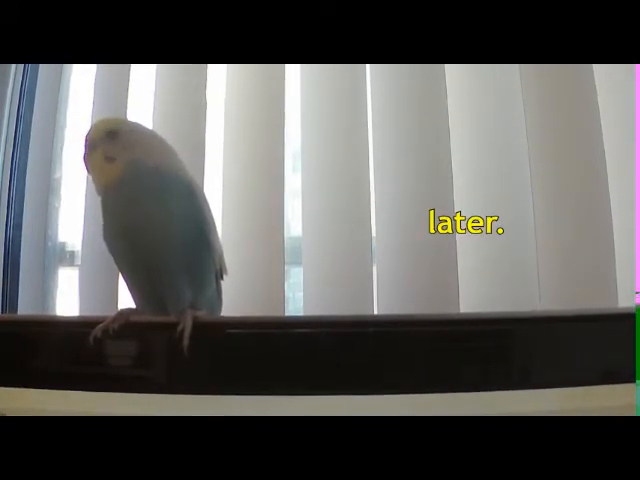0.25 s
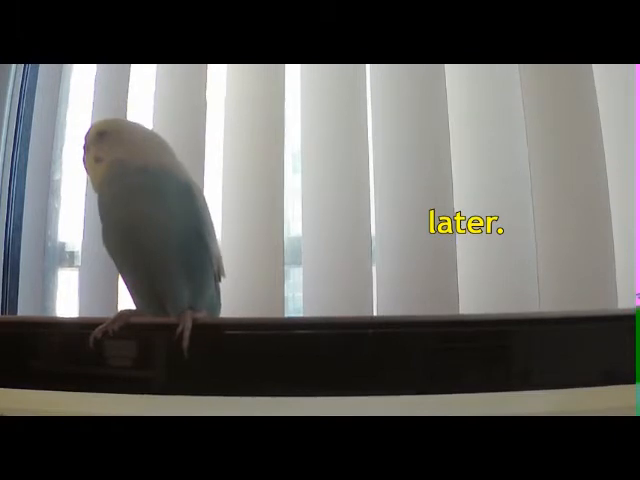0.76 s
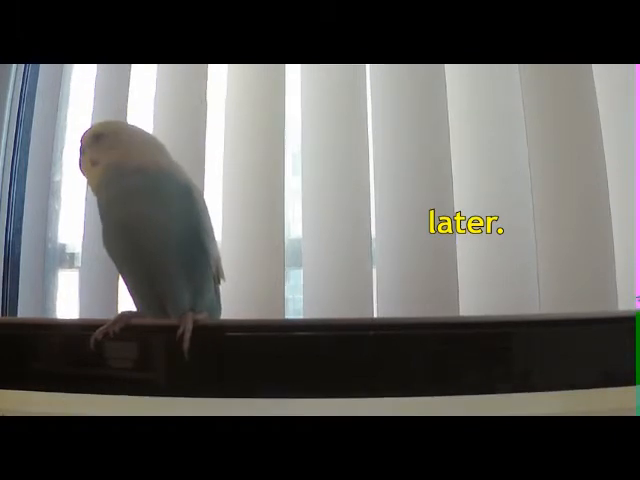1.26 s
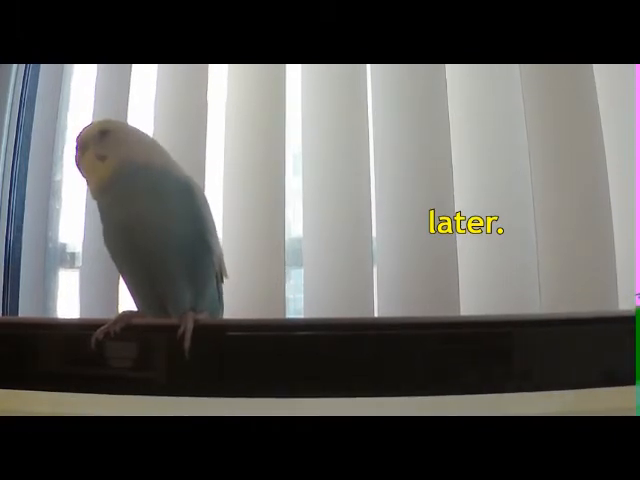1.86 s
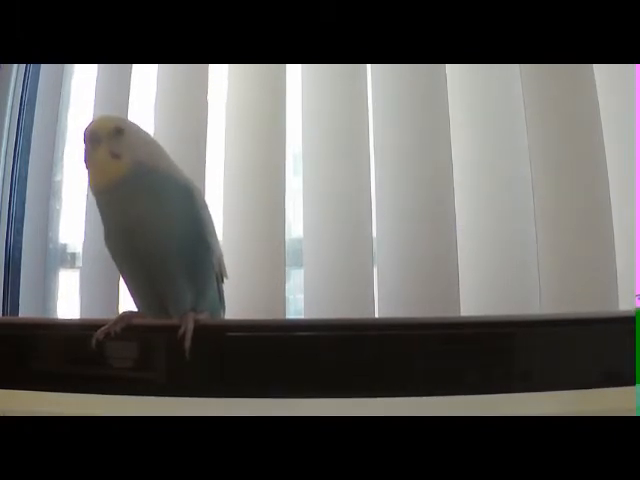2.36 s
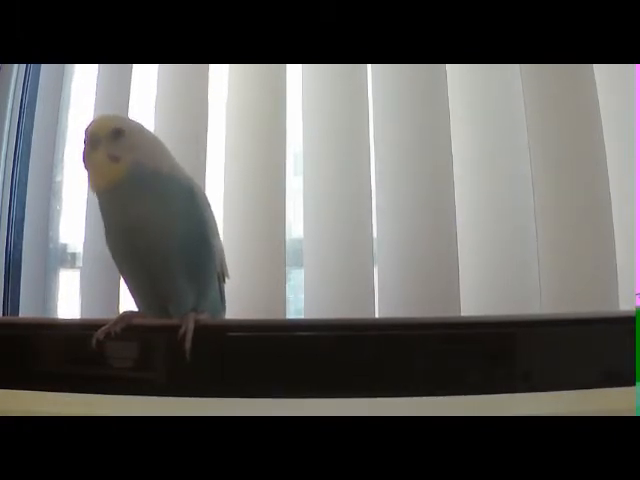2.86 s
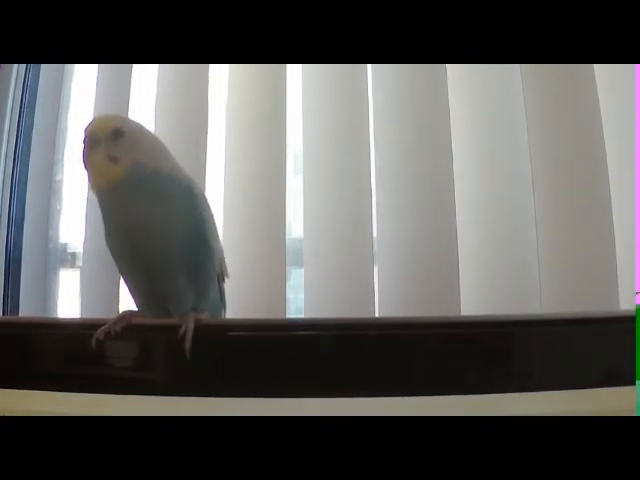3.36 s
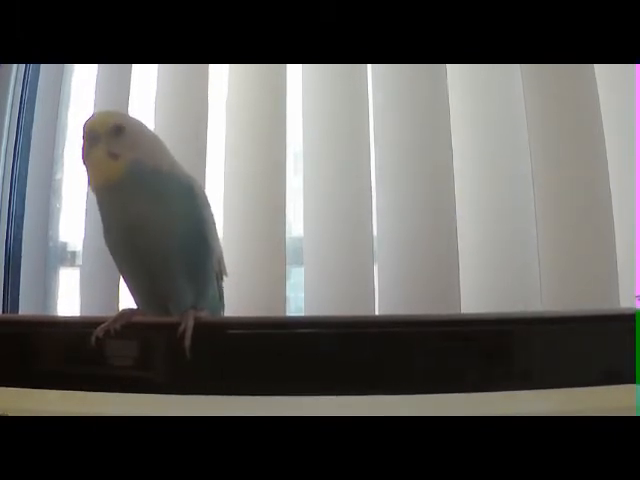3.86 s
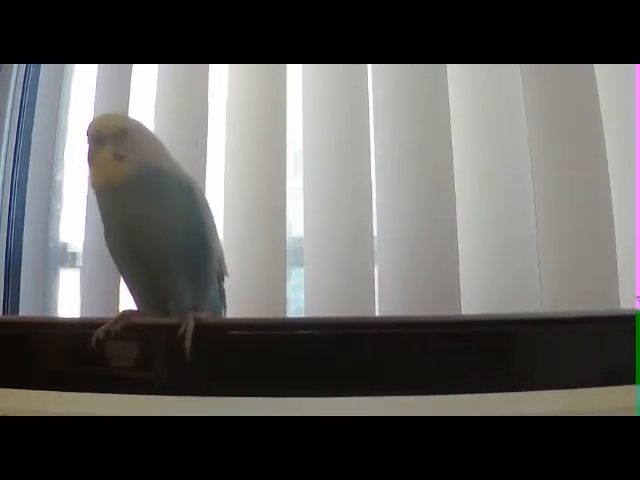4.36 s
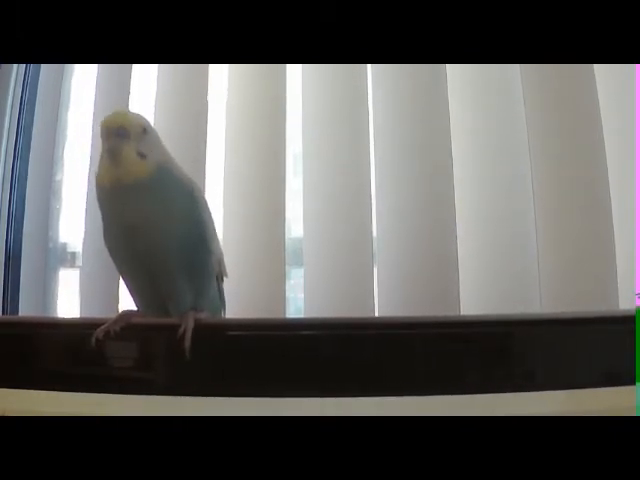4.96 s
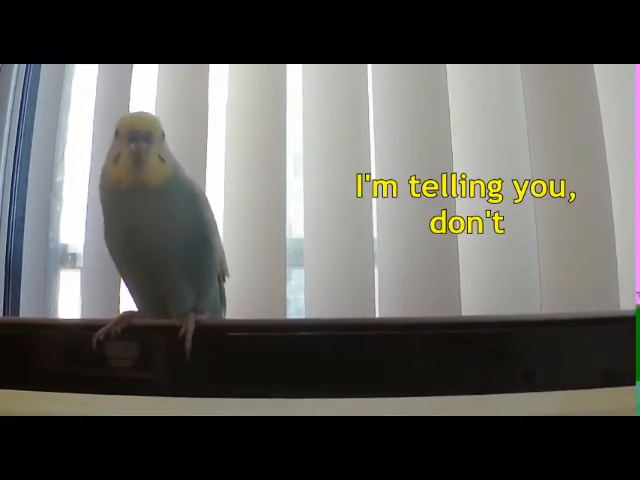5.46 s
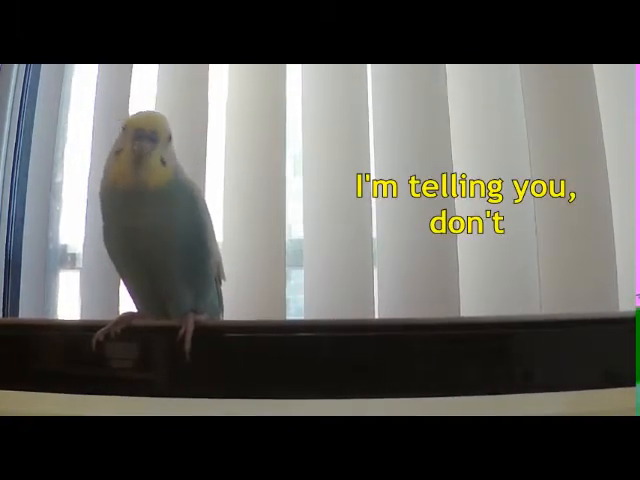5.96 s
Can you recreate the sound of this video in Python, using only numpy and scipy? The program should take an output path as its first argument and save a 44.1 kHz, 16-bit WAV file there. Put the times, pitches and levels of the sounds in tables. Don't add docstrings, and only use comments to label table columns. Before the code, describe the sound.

Close stereo pickup of a budgie indoors, slightly to the left, with brief wall reflections. Steady fan air and uneven low rumble lie underneath. The bird opens with a buzzy gated warble that breaks into slower stutters, then peeps and whistles piercingly. Isolated clucks and short calls lead to a bright descending five-chirp trill. It finishes with beak clicks, raspy breathy chatter and scattered clucks.

```python
import sys
import numpy as np
from scipy import signal
from scipy.fft import rfft, irfft, next_fast_len
from scipy.io import wavfile
from scipy.ndimage import uniform_filter1d, map_coordinates

SR = 44100
rng = np.random.default_rng(int(sys.argv[2]) if len(sys.argv) > 2 else 0)


def volts_from_decibels(level):
    exponent = np.asarray(level, float) / 20
    return 10 ** exponent


def materialize(psi):
    bounded = np.clip(np.atleast_2d(psi).T, -1, 1)
    quanta = np.round(bounded * 32767).astype(np.int16)
    wavfile.write(sys.argv[1], SR, quanta)


N = 273420
LEFT_RIGHT = np.array([[.5], [-.5]])

# [t/s, f/Hz, level/dB]
CHIRPS = [
    [(4.529, 3750, -37), (4.535, 3520, -25.5), (4.545, 3554, -26), (4.559, 3050, -11.5), (4.567, 3020, -8),
     (4.577, 2625, -11.5), (4.583, 2680, -17), (4.589, 2378, -14.5), (4.601, 2397, -13.5)],
    [(4.601, 3674, -21.5), (4.611, 3645, -19), (4.623, 3220, -18), (4.627, 3153, -13.5),
     (4.635, 3064, -15.5), (4.647, 2830, -22.5), (4.657, 2825, -16.5), (4.665, 2533, -22),
     (4.671, 2462, -22)],
    [(4.672, 3774, -28), (4.682, 3710, -22), (4.69, 3258, -17.5), (4.702, 3100, -14), (4.71, 2803, -18.5),
     (4.718, 2830, -17.5), (4.726, 2540, -17.5), (4.733, 2440, -19)],
    [(4.734, 3884, -36.5), (4.744, 3640, -23), (4.756, 3275, -31.5), (4.76, 3100, -21.5), (4.77, 3175, -19),
     (4.792, 2380, -18), (4.801, 2366, -23)],
    [(4.813, 3446, -17), (4.819, 3443, -31), (4.827, 3090, -13), (4.837, 3095, -24), (4.847, 2740, -16.5),
     (4.851, 2665, -23), (4.857, 2425, -15), (4.863, 2384, -16.5), (4.872, 2460, -18)],
]
# [f/Hz, level/dB]
CHIRP_OVERTONE_FADE = [(2420, -29.5), (2750, -15), (3060, -18), (3400, -10), (3720, -8)]
CHIRP_BRIGHT_DB = [-0.5, 0, 3.5, 3, 2.5]
# [start t/s, length t/s, first f/Hz, last f/Hz, level/dB]
PEEPS = [
    (1.669, 0.038, 2520, 3040, -39.5),
    (1.748, 0.04, 2764, 3055, -38),
    (4.87, 0.013, 3800, 3500, -29),
]
# [t/s, f/Hz, level/dB]
CALLS = [
    [(1.852, 2260, -24), (1.86, 2160, -48.5), (1.872, 2530, -23.5), (1.876, 2510, -24.5),
     (1.894, 2535, -40), (1.905, 3100, -33)],
    [(1.906, 3800, -38.5), (1.916, 3760, -26), (1.924, 3720, -21), (1.931, 3560, -20), (1.941, 3330, -9),
     (1.946, 3560, -4.5), (1.958, 3590, -9.5), (1.967, 3713, -8.5), (1.977, 3716, -39)],
    [(2.96, 2900, -37), (2.968, 2824, -20.5), (2.974, 2893, -15), (2.98, 2883, -15), (2.986, 3100, -20),
     (2.989, 3030, -17.5), (2.993, 2750, -31)],
    [(3.815, 3470, -27), (3.824, 3430, -32), (3.828, 3150, -25.5), (3.833, 3470, -16), (3.844, 3200, -29),
     (3.849, 2904, -16), (3.863, 2850, -17.5), (3.869, 2680, -19), (3.878, 2490, -43)],
    [(4.127, 3560, -32), (4.139, 3370, -24.5), (4.157, 2830, -18), (4.165, 2834, -19), (4.169, 2910, -17),
     (4.191, 2423, -19.5), (4.199, 2446, -24), (4.203, 2474, -42)],
]
# [first level/dB, last level/dB]
CALL_BRIGHT_DB = [(-29, -22), (-12, -22), (-12, -21.5), (-8.5, -25), (-13, -34)]
# [t/s, depth/dB]
CATCHES = [(1.872, 24), (1.881, 14), (1.929, 3), (1.9327, 6), (1.9445, 15), (1.9478, 11), (1.951, 24),
           (1.96, 6), (1.9674, 14), (2.966, 17), (2.97, 11), (2.981, 11), (2.992, 9), (2.992, 12),
           (3.825, 6), (3.8319, 21), (3.847, 8), (3.856, 15), (3.8668, 14), (3.87, 14), (4.148, 18),
           (4.166, 10), (4.178, 25),
           (4.5545, 4), (4.5597, 0), (4.5682, 18), (4.5722, 9), (4.577, 14), (4.5865, 4), (4.614, 2),
                 (4.6215, 4), (4.643, 9), (4.6488, 2), (4.688, 8), (4.694, 5), (4.711, 4), (4.7202, 8),
                 (4.7473, 6), (4.7555, 7), (4.772, 2), (4.782, 5), (4.7859, 16), (4.823, 5), (4.8414, -4),
                 (4.854, 5)]
# [t/s, depth 0-1, width/s]
SLOW_REED = [(1.953, 0.64, 0.003), (2.962, 0.7, 0.0034), (2.987, 0.47, 0.0093)]
# [level/dB, flutter strength]
FLUTTER = [(-40, 1.5), (-30, .55), (-20, .32), (-8, .24)]
# [multiple of the pitch, level/dB]
OVERTONES = [(2, -11), (3, 3), (4, 4.5), (5, 9), (6, 17)]
# [f/Hz, level/dB per Hz]
TURBULENCE = [(3500, -30), (4800, -16), (6180, -10), (7090, -13), (8610, -9), (11100, 1), (15700, -5)]
# [f/Hz, level/dB]
BEAK_TO_MIC = [(1000, -8), (3000, -25), (5000, -8), (7000, -0.5), (8800, 1.5), (11000, -10), (13000, -25.5),
               (16000, -8)]

# [t/s, peak level/dB, extra brightness/dB]
GATES = [(0.674, -18.5, 5), (0.691, -21.5, -1), (0.6972, -24, -6), (0.7038, -19, -6), (0.716, -20.5, 2),
         (0.727, -19, -5), (0.738, -19.5, 5), (0.7512, -19, -2), (0.763, -28, 7), (0.7731, -21.5, 1),
         (0.785, -21.5, -1), (0.7973, -17, -5), (0.809, -21.5, 3.5), (0.8209, -25, 3), (0.8315, -14.5, -11),
         (0.845, -17.5, -2), (0.8577, -20.5, -4), (0.8678, -24, 1.5), (0.8812, -13, -7),
         (0.894, -17.5, 1.5), (0.9046, -13.5, -4), (0.9176, -12, -2), (0.9286, -15.5, -2), (0.9401, -15, 0),
         (0.9552, -17.5, 11), (0.9666, -14, -6), (0.9804, -13.5, -1.5), (0.998, -14, -1)]
# [f/Hz, upper f/Hz, upper level/dB]
GATE_TONES = [(1050, 2240, -5), (1940, 3112, -3), (1960, 1500, -2), (1090, 3144, -5), (1190, 2487, 3),
              (1160, 2340, -2), (1174, 2476, 5), (1110, 2200, 3), (1040, 2800, 10), (1055, 2229, 3),
              (1109, 2300, 6), (1274, 2573, 5), (1332, 2616, 11.5), (1324, 2627, 14), (1280, 4000, 1),
              (1400, 2885, 4), (1271, 2595, 3), (1460, 2961, 10), (1560, 1900, -6), (1626, 3700, -5),
              (1580, 3070, -4), (1630, 3300, -6), (1540, 2918, -1), (1626, 3144, -6), (1690, 1992, 3),
              (1647, 3800, -7), (1744, 6100, -8), (1647, 1900, -11)]
# [t/s, brightness/dB]
CHURR_BRIGHT = [(0.6748, -16), (0.7042, -6.5), (.7396, -10.5), (0.7735, -8), (0.8092, -3), (0.8812, -4),
                (.955, -13), (0.9809, -9), (0.998, -7)]
# [t/s, peak level/dB, f/Hz, brightness/dB]
STUTTER = [(0.611, -18.5, 1570, -20), (.628, -28.5, 1595, -8), (0.6453, -15.5, 1470, -13),
           (0.6585, -16.5, 1600, -13), (0.6667, -18, 1070, -13), (0.6828, -24.5, 1150, -7),
           (1.0112, -13.5, 1850, -15), (1.0212, -18, 1960, -7.5), (1.035, -13.5, 1960, -14.5),
           (1.046, -11, 1960, -16.5), (1.0581, -13.5, 1900, -20), (1.0719, -12.5, 1600, -31),
           (1.098, -14, 1600, -31), (1.1053, -12, 1960, -18.5), (1.1238, -15.5, 1626, -21),
           (1.146, -11, 1600, -25), (1.175, -16.5, 1647, -25), (1.2055, -15.5, 1550, -25),
           (1.257, -16, 1940, -17), (1.296, -24.5, 1130, -19)]
# [f/Hz, level/dB]
STUTTER_TONES = [(3120, -7), (3070, -3), (3015, 0.5), (3120, -11), (3100, -3), (2530, 2), (2900, -10),
                 (2590, -10), (3840, -21), (3780, -18), (1730, 5), (1949, -14), (2620, -17), (1600, 2),
                 (1916, -1), (2580, -18), (3100, -18), (1916, -8), (1647, -5), (1960, -2)]
# [t/s, peak level/dB, f/Hz, brightness/dB]
CLUCKS = [(2.7272, -18, 1616, -12), (2.8825, -26, 2270, -30), (2.854, -31, 1450, -13),
          (2.8675, -31, 2400, -30), (2.8735, -10.5, 2440, -42), (3.6096, -24.5, 1406, -27),
          (3.7194, -28.5, 1496, -25), (3.7993, -22, 1940, -15), (5.657, -22, 1960, -18),
          (5.678, -22, 2450, -21), (5.715, -21, 1434, -39), (5.7295, -14, 1630, -32),
          (5.7424, -10.5, 2400, -27), (5.751, -21, 2000, -30), (5.756, -14, 1960, -22.5),
          (5.859, -21.5, 1240, -38), (5.874, -17, 1240, -25), (5.885, -22, 1140, -35),
          (5.9, -17, 1286, -32), (5.932, -14.5, 1410, -39), (5.95, -14, 1580, -42),
          (5.9707, -17, 1660, -20), (6.1053, -21, 2030, -14), (6.119, -24, 1960, -28),
          (6.1294, -22.5, 1044, -15.5), (6.167, -38, 1200, -2)]
# [cluck f/Hz, other f/Hz]
CLUCK_SECOND_HZ = [(1200, 1300), (1360, 2750), (1420, 1980), (1500, 2650), (1603, 3380), (1666, 2430),
                   (1950, 3020), (2400, 2010)]
# [cluck f/Hz, level/dB]
CLUCK_SECOND_DB = [(1200, -11), (1420, 0), (1500, -12), (1603, -4.5), (1666, -7), (1950, -10), (2400, -10)]
# [brightness/dB, attack/s, hold/s, time to fall 60 dB/s]
SWELL = [(-28, 0.0016, 0.0041, 0.025), (-17, 0.0018, 0.0023, 0.026), (-6, 0.0011, 0.0031, 0.024)]
# [f/Hz, level/dB per Hz]
RUSTLE = [(700, -9), (1100, -7.5), (1600, 10), (2000, 8.5), (2600, 4), (3300, -1), (3900, -10),
          (5000, -21.5), (6500, -30)]

# [start t/s, length t/s, level/dB, upper throat level/dB, breath level/dB]
CHATTER = [
    (1.932, 0.047, -39, 21, -41),
    (1.889, 0.023, -46, 19, -38),
    (2.853, 0.048, -34, 30, -41),
    (5.65, 0.078, -35, 15, -36),
    (5.722, 0.13, -24, 7.5, -36.5),
    (5.898, 0.076, -38, -4, -39.5),
    (6.067, 0.048, -44, 2, -38),
]
PULSED = [.5, .5, .5, .12, .9, .6, .5]
# [share of length, effort/dB, beak closing/dB, breath/dB]
PHRASE_SHAPE = [(0, -8.5, -10, -12), (.12, -3, -3, -12), (.3, -3, -7.5, 6), (.9, -5, -18, -8),
                (1, -4, -20, -18)]
# [f/Hz, width/Hz, level/dB]
CHEST = [(430, 150, -25.5), (774, 810, -10), (1200, 830, -8.5)]
# [f/Hz, width/Hz, level/dB]
THROAT = [(1558, 105, 1.5), (1960, 89, 2.5), (2360, 130, -1.5), (3130, 460, -14), (3720, 250, -19)]
# [f/Hz, level/dB per Hz]
HISS = [(2350, -6), (4000, -7), (6180, -12), (7090, -4.5), (8610, 0.5), (11100, -8.5), (14300, -5),
        (15700, -1.5)]

# [t/s, peak level/dB]
CLICKS = [(2.082, -26), (1.201, -24), (1.252, -22), (1.225, -31), (1.95, -14), (2.964, -18), (5.5981, -9.5),
          (5.6007, -11), (5.602, -9), (5.6048, -15), (5.618, -35), (5.653, -20), (5.731, -19),
          (5.7437, -23), (5.885, -28), (5.934, -27), (5.9705, -26), (6.1045, -29), (6.119, -33),
          (6.131, -26)]
# [f/Hz, level/dB per Hz]
SNAP = [(410, -31), (700, -2), (1600, 1.5), (2930, -7), (3640, -3), (4870, -4.5), (9330, -2), (15700, -8)]

# [f/Hz, left-right level/dB]
SIDEWAYS = [(2000, 1.5), (4000, 3), (8000, -2), (12000, 4)]
# [delay t/s, left level/dB, right level/dB]
WALLS = [(.0026, -26, -30), (.0061, -25, -10), (0.0093, -17.5, -18), (0.0177, -34, -34), (0.021, -36, -39)]
# [f/Hz, time to fall 60 dB/s]
ROOM = [(2500, 0.33), (3500, 0.37), (8000, 0.25), (14000, 0.33)]
# [f/Hz, level/dB]
WALL_COLOUR = [(2400, -1), (3000, 1), (3600, -1), (4500, 3), (8000, -5.5), (14000, -1)]

# [f/Hz, level/dB per Hz]
AIR = [(41, -48), (66, -7), (90, -15.5), (126, -10.5), (200, -10), (290, -12), (400, -17.5), (520, -16.5),
       (790, -20), (1500, -25.5), (2400, -31.5), (5000, -40.5), (9000, -43), (15700, -45.5)]
# [f/Hz, likeness -1 to 1]
AIR_LIKENESS = [(60, -0.31), (130, 0.52), (290, 0.29), (640, 0.45), (1410, 0.44), (3100, 0.59),
                (6820, 0.004), (15000, 0.026)]
# [f/Hz, left-right level/dB]
AIR_LEAN = [(60, 0.5), (180, -2.5), (550, -2.5), (1650, -1), (4970, 0), (15000, 0)]
# [f/Hz, level/dB per Hz]
RUMBLE = [(2.4, -25), (4.0, 11), (21, 5.5), (65, -21.5), (87, -19.5), (110, -27), (140, -60), (240, -120)]
# [t/s, level/dB]
RUMBLE_DB = [(0.0, -23.5), (0.79, -34), (1.24, -25), (1.66, -30), (2.12, -22), (2.61, -28), (5.06, -28),
             (5.32, -20), (5.7, -34.5), (6.2, -16)]
# [f/Hz, level/dB, width/Hz, left-right level/dB]
HUM = [(56.9, -40.5, 1.7, -12.5), (121, -56, 1.37, 12), (255.2, -34.5, 1.242, -13),
       (361.2, -50.5, 3.045, 8.5), (524, -53, 2.086, 11), (1018, -52, 1.85, -5)]
# [t/s, f/Hz, level/dB]
WHINE = [(4.7, 787, -49), (5.2, 806, -43), (6.2, 799, -50.5)]

# [t/s, peak level/dB]
TICKS = [(0.0792, -47), (0.3994, -51.5), (1.3994, -60), (1.6023, -46), (2.2294, -56), (2.4344, -48),
         (2.5456, -53), (3.3794, -50), (3.7294, -58), (3.9994, -48), (4.4294, -49), (4.9994, -58),
         (5.3178, -47)]


def unit(x):
    return x / np.sqrt(np.mean(x ** 2) + 1e-20)


def along(points, hz):
    f, v = np.transpose(points)
    return np.interp(np.log(np.abs(hz) + 1), np.log(f + 1), v)


def played(rows):
    s, *cols = np.transpose(rows)
    first = round(s[0] * SR)
    t = np.arange(first, round(s[-1] * SR)) / SR
    gate = np.clip(np.minimum(t - s[0], s[-1] - t) / 0.00069 + .3, 0, 1)
    return first, gate, [np.interp(t, s, c) for c in cols]


def wobble(rate, size):
    knots = rng.standard_normal(int(size * rate / SR) + 4)
    return map_coordinates(knots, [np.arange(size) * rate / SR])


def filtered(x, response):
    m = next_fast_len(N + SR // 2)
    return irfft(rfft(x, m) * response(np.fft.rfftfreq(m, 1 / SR)), m)[..., :N]


def noise(spectrum):
    return unit(filtered(rng.standard_normal(N), lambda f: volts_from_decibels(along(spectrum, f))))


def resonant(modes):
    def response(f):
        return sum((-1) ** k * volts_from_decibels(db) * 1j * f * width / (centre * centre - f * f + 1j * f * width)
                   for k, (centre, width, db) in enumerate(modes))
    return response


def notes():
    for rows, bright_db in zip(CHIRPS, CHIRP_BRIGHT_DB):
        s, hz, db = np.transpose(rows)
        yield np.c_[s, hz, db - 0.5, along(CHIRP_OVERTONE_FADE, hz) + bright_db]
    for s, length, first_hz, last_hz, db in PEEPS:
        yield [(s + u * length, first_hz + u * (last_hz - first_hz), db - 5.5 * abs(2 * u - 1), -17)
               for u in (0, .5, 1)]
    for rows, ends_db in zip(CALLS, CALL_BRIGHT_DB):
        yield np.c_[rows, np.linspace(*ends_db, len(rows))]


def whistles():
    t = np.arange(N) / SR
    hz, gain, bright_db = np.zeros(N), np.zeros(N), np.full(N, -60.)
    for rows in notes():
        i, gate, (pitch, db, over_db) = played(rows)
        span = slice(i, i + len(gate))
        hz[span], gain[span], bright_db[span] = pitch, volts_from_decibels(db + 5.5), over_db
    flutter = np.interp(20 * np.log10(gain + 1e-6) - 6, *np.transpose(FLUTTER))

    catch, sung = np.zeros(N), t[gain > 0]
    catch[gain > 0] = sum(db * np.exp(-((sung - s) / np.where(sung < s, .0012, .0009)) ** 2)
                          for s, db in CATCHES)
    shiver_db = flutter * (1.2 * wobble(250, N) + 2.2 * wobble(900, N))
    gain = uniform_filter1d(gain, size=70) * volts_from_decibels(shiver_db - catch)

    hz = uniform_filter1d(np.interp(t, t[hz > 0], hz[hz > 0]), size=44)
    hz = hz * (1 + flutter * (.014 * wobble(180, N) + .03 * wobble(700, N)))

    reed = np.sin(2 * np.pi * np.cumsum(540 + 80 * wobble(150, N)) / SR)
    squeeze = sum(depth * np.exp(-((t - s) / width) ** 2) for s, depth, width in SLOW_REED)
    gain = gain * (1 + squeeze * reed)

    phase = 2 * np.pi * np.cumsum(hz) / SR
    fray = .2 * flutter ** 2 * wobble(1200, N)
    upper = np.zeros(N)
    for k, db in OVERTONES:
        level = volts_from_decibels(db + along(BEAK_TO_MIC, k * hz) + 3.36 * wobble(200, N))
        upper += level * (k * hz < SR / 2.2) * np.sin(round(k) * (phase + fray))
    return gain * (np.sin(phase) + volts_from_decibels(bright_db) * (upper + volts_from_decibels(-8.0) * noise(TURBULENCE)))


def bursts():
    s, db, extra_db = np.transpose(GATES)
    hz, upper_hz, upper_db = np.transpose(GATE_TONES)
    high_db = np.interp(s, *np.transpose(CHURR_BRIGHT)) + extra_db
    gates = np.c_[s, db, hz, high_db, upper_hz, upper_db]
    _, _, hz, high_db = np.transpose(CLUCKS)
    second_db = along(CLUCK_SECOND_DB, hz) + 0.18 * (high_db + 16.0)
    clucks = np.c_[CLUCKS, along(CLUCK_SECOND_HZ, hz), second_db]
    return np.vstack([gates, np.c_[STUTTER, STUTTER_TONES], clucks])


def churr():
    out, t = np.zeros(N + SR), np.arange(SR // 32) / SR
    size = len(t)
    rustle, hiss = noise(RUSTLE), noise(HISS)
    swell_db, *swell_times = np.transpose(SWELL)
    for s, db, hz, high_db, second_hz, second_db in bursts():
        i = round(s * SR)
        grit, rasp = rustle[i:][:size], hiss[i:][:size]
        second_hz = second_hz * rng.normal(1, .006)
        hz = hz * rng.normal(1, .004)
        turn = 2 * np.pi * np.cumsum(1 + .013 * wobble(600, size)) / SR
        second = np.sin(second_hz * turn + .35 * wobble(900, size))
        low = np.sin(hz * turn) + volts_from_decibels(second_db) * second + volts_from_decibels(-9) * grit
        partials = np.zeros(size)
        for k in range(3, 15):
            if k * hz < SR / 2.5:
                level = volts_from_decibels(along(BEAK_TO_MIC, k * hz) + rng.normal(0, 1.0))
                partials += level * np.sin(k * hz * turn + rng.uniform(0, 7.5))
        high = volts_from_decibels(high_db + 7.0 - 60 * t / 0.045) * (partials + volts_from_decibels(3) * rasp)
        attack, hold, t60 = (np.interp(high_db, swell_db, c) for c in swell_times)
        fall_db = -60 * np.maximum(t - hold, 0) / t60
        shape = np.minimum(t / attack, 1) * volts_from_decibels(fall_db) * volts_from_decibels(0.61 * wobble(570, size))
        linger = volts_from_decibels(-14 - 60 * t / 0.029) * np.cos(np.pi / 2 * t / t[-1]) * grit
        out[i:][:size] += volts_from_decibels(db - 9.0) * (shape * (low + high) + linger)
    return out[:N]


def chatter():
    beak_open, voice, breath, pulsed = np.zeros(N), np.zeros(N), np.zeros(N), np.full(N, .5)
    for (s, length, *levels_db), share in zip(CHATTER, PULSED):
        rows = np.multiply(PHRASE_SHAPE, [length, 1, 1, 1]) + [s, *levels_db]
        i, gate, (db, upper_db, hiss_db) = played(rows)
        span = slice(i, i + len(gate))
        pulsed[span], beak_open[span] = share, volts_from_decibels(upper_db)
        voice[span], breath[span] = gate * volts_from_decibels(db), gate * volts_from_decibels(hiss_db)

    turns = 298 * (np.arange(N) / SR - 5.7615) + 4000 + .14 * wobble(250, N)
    count = np.floor(turns)
    pulse_db = np.clip(1.6 * rng.standard_normal(N), -9, 3) - 7 * (count % 2)
    pulses = np.diff(count, prepend=count[0]) * volts_from_decibels(pulse_db)

    rough = pulsed * unit(pulses) + (1 - pulsed) * rng.standard_normal(N)
    rough = filtered(rough, lambda f: 1 / (1 + 1j * f / 4170) ** 2)
    lower = unit(filtered(rough, resonant(CHEST + THROAT[:1])))
    upper = unit(filtered(rough, resonant(THROAT[1:])))
    puffs = 1.4 * (1 - pulsed) + 0.29 + pulsed * unit(signal.lfilter([1], [1, -.97], pulses))
    hiss = filtered(puffs * rng.standard_normal(N), lambda f: volts_from_decibels(1.64 * along(HISS, f)))
    return voice * (lower + beak_open * upper) / np.sqrt(1 + beak_open ** 2) + breath * unit(hiss)


def beak():
    t = np.arange(N) / SR
    blows = sum(volts_from_decibels(db - 8.0 - 60 * np.maximum(t - s, 0) / 0.01) * (t >= s) for s, db in CLICKS)
    return blows * noise(SNAP)


def room(x):
    hz, t, z = signal.stft(rng.standard_normal((2, 2, SR // 2)), SR, nperseg=256)
    tails = signal.istft(z * volts_from_decibels(-60 * t / along(ROOM, hz)[:, None]), SR, nperseg=256)[1]
    tails = tails + .5 * tails[:, ::-1]
    tails = volts_from_decibels(-11.0) * tails / np.linalg.norm(tails[0, 0])
    x = filtered(x, lambda f: volts_from_decibels(along(WALL_COLOUR, f)))
    x = x * volts_from_decibels(3 * wobble(200, N))
    one, other = signal.fftconvolve(x[None, None], tails, axes=2)[..., :N]
    stir = 1.8 * wobble(90, N)
    early = sum(volts_from_decibels(np.c_[db]) * np.roll(x, round(delay * SR)) for delay, *db in WALLS)
    return early + np.cos(stir) * one + np.sin(stir) * other


def rush(spectrum, alike, patchy_db):
    z = signal.stft(rng.standard_normal((2, N)), nperseg=512)[2]
    field = uniform_filter1d(rng.standard_normal(z.shape[1:]), 6, 0)
    field = uniform_filter1d(field, 14, 1)
    pair = signal.istft(z * volts_from_decibels(patchy_db * unit(field)), nperseg=512)[1][:, :N]

    def middle_and_side(f):
        turn = np.arccos(np.clip(along(alike, f), -1, 1)) / 2
        return volts_from_decibels(along(spectrum, f)) * [np.cos(turn), np.sin(turn)]
    mid, side = filtered(pair, middle_and_side)
    return np.array([mid + side, mid - side])


def fan():
    t = np.arange(N) / SR
    air = rush(AIR, AIR_LIKENESS, patchy_db=0.9)
    air = filtered(air, lambda f: volts_from_decibels(along(AIR_LEAN, f) * LEFT_RIGHT))
    air = volts_from_decibels(-40) * air / np.std(filtered(air.mean(0), lambda f: f > 300))

    s, db = np.transpose(RUMBLE_DB)
    rumble = volts_from_decibels(np.interp(t, s, db) + 2.5) * unit(rush(RUMBLE, [(30, -0.26)], patchy_db=3.0))

    hum = np.zeros((2, N))
    for hz, db, width, lean in HUM:
        level = volts_from_decibels(db + lean * LEFT_RIGHT + 1.18 * wobble(2.5 * width, N))
        hum += level * np.sin(2 * np.pi * hz * t + wobble(width, N) + [[-.35], [.35]])

    i, gate, (hz, db) = played(WHINE)
    size = len(hz)
    whine_phase = 2 * np.pi * np.cumsum(hz + 9 * wobble(7.7, size)) / SR
    whine = volts_from_decibels(db - 3.5 + 3.7 * wobble(13.2, size)) * np.sin(whine_phase)
    return air + rumble + hum + np.pad(whine, (i, N - i - size))


def motor():
    t = np.arange(N) / SR
    swell = sum(volts_from_decibels(db + 5.0) * np.exp(-((t - s - .006) / 0.009) ** 2) for s, db in TICKS)
    colour = [(9000, -38), (13000, -16), (15500, -6)]  # f/Hz, level/dB per Hz
    fizz = filtered(rng.standard_normal((2, N)), lambda f: volts_from_decibels(along(colour, f)))
    return swell * unit(fizz)


def scene():
    def windpipe(f):
        return 1 - 0.067 * np.exp(-((f - 4900) / 600) ** 2)

    def ports(f):
        level = along(SIDEWAYS, f) * np.log(10) / 20
        lag = 2j * np.pi * f * 0.00001
        return np.exp((level + lag) * LEFT_RIGHT)
    bird = filtered(whistles() + churr() + chatter(), windpipe) + beak()
    bird = filtered(bird, lambda f: 1 / (1 + (f / 13500) ** 6))
    return volts_from_decibels(-1.0) * (filtered(bird, ports) + room(bird)) + fan() + motor()


def top_cut(x):
    return signal.sosfilt(signal.butter(12, 15860, fs=SR, output="sos"), x)


def record(dry):
    mix = dry / (1 + np.abs(dry / .99) ** 8) ** (1 / 8)
    return top_cut(mix)


dry = scene()
out = record(dry)
materialize(out)
```